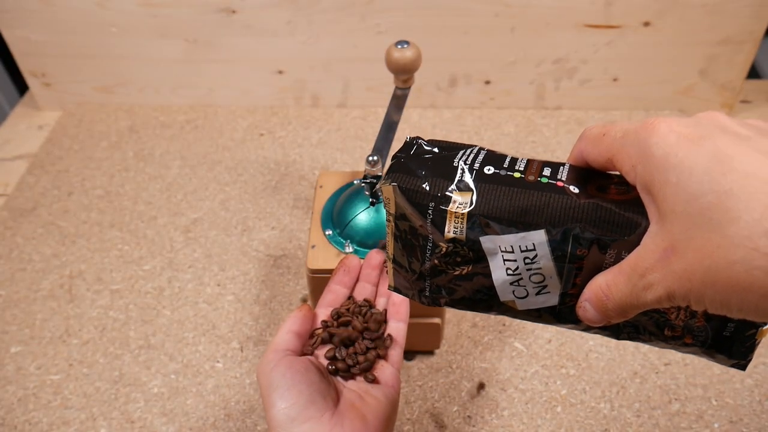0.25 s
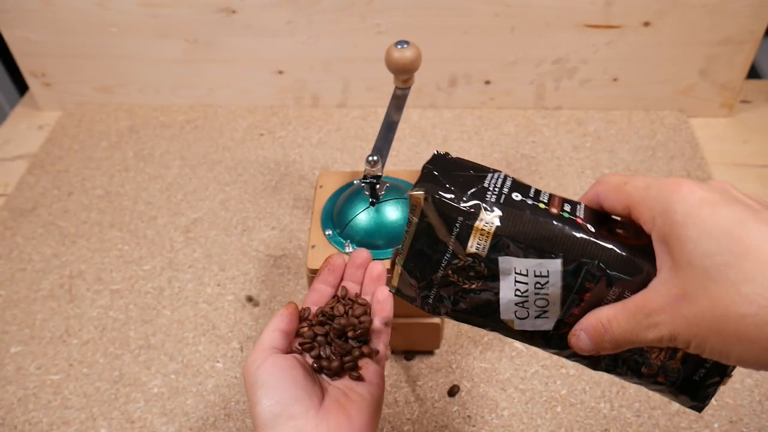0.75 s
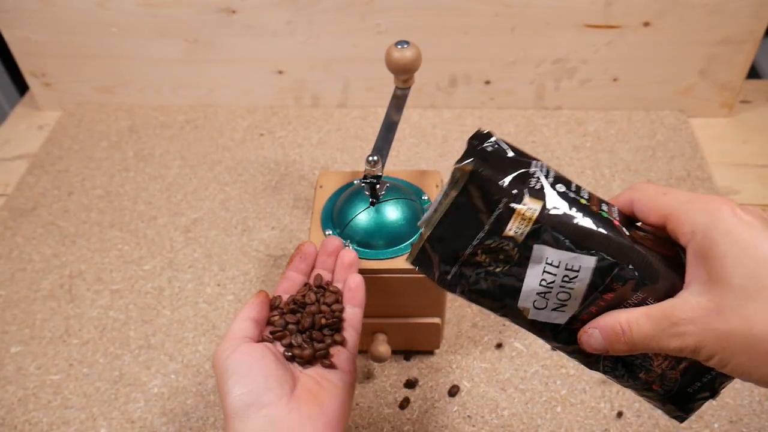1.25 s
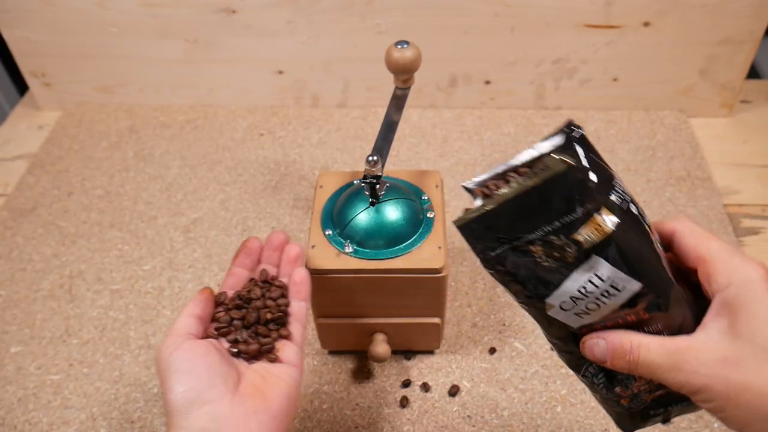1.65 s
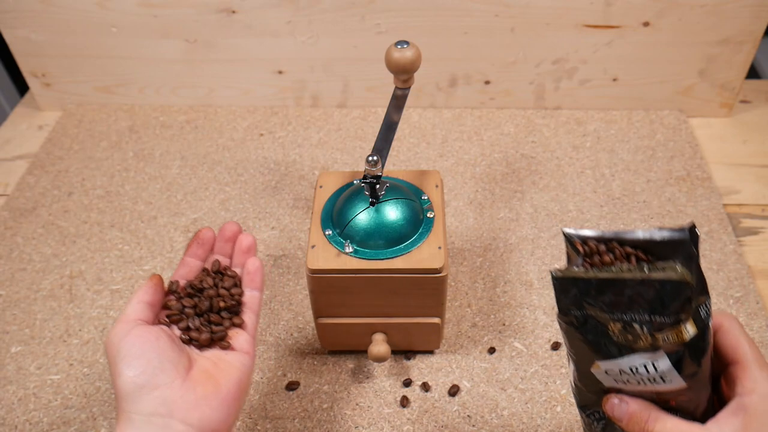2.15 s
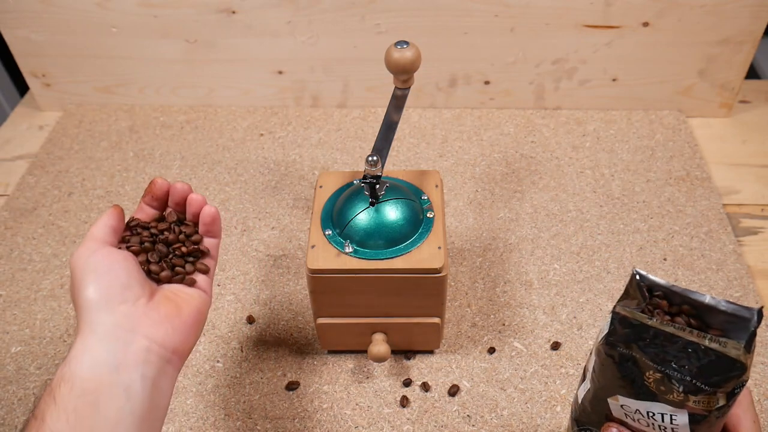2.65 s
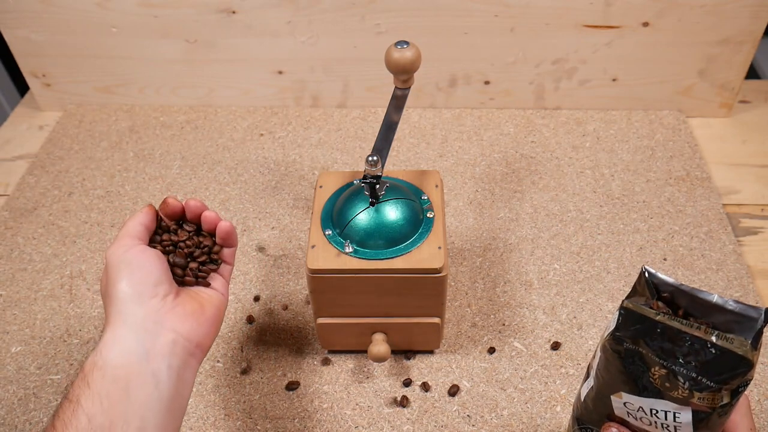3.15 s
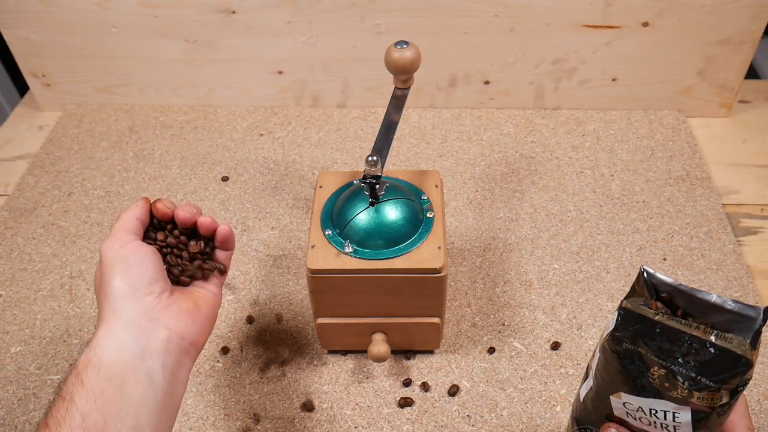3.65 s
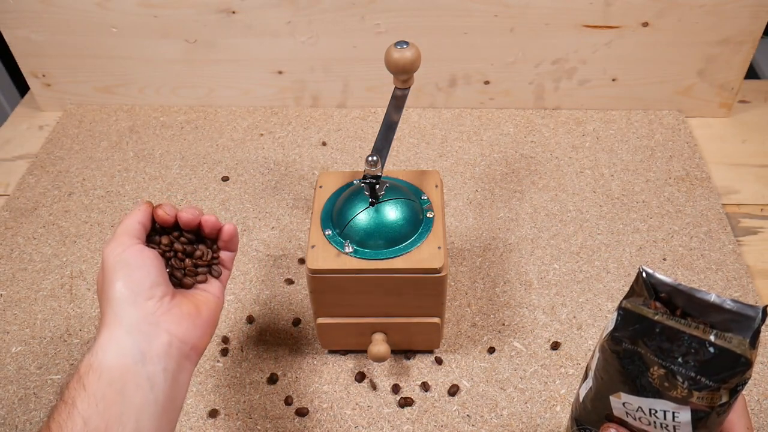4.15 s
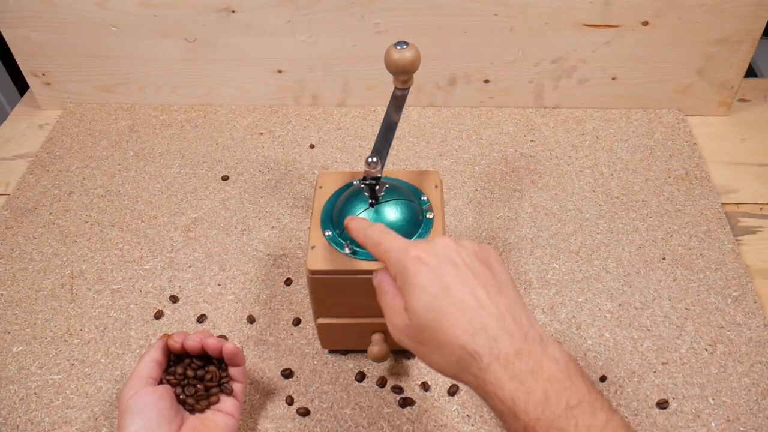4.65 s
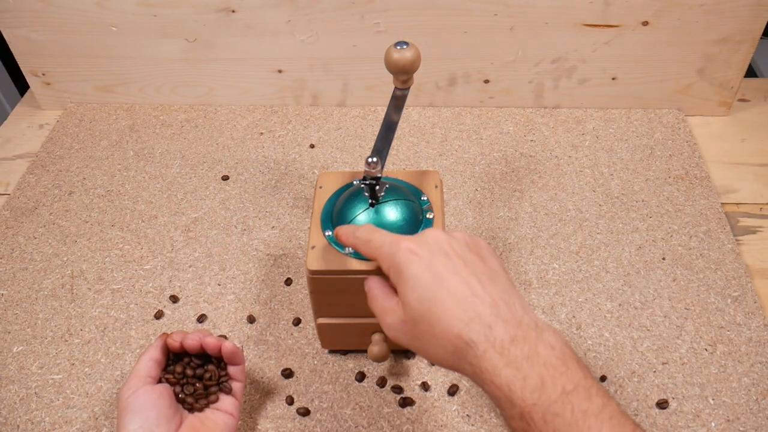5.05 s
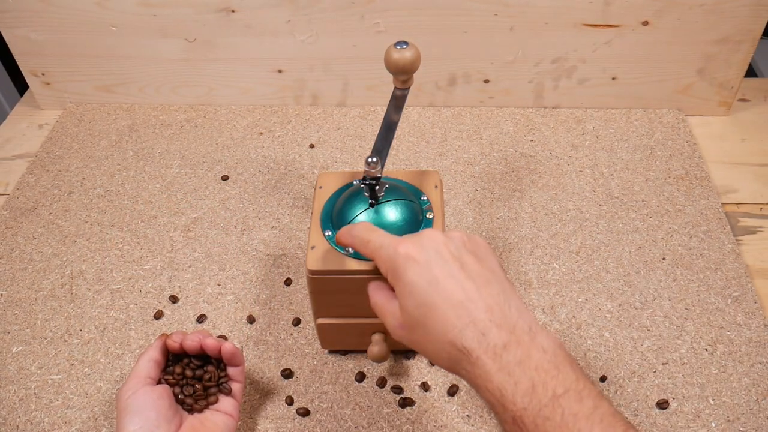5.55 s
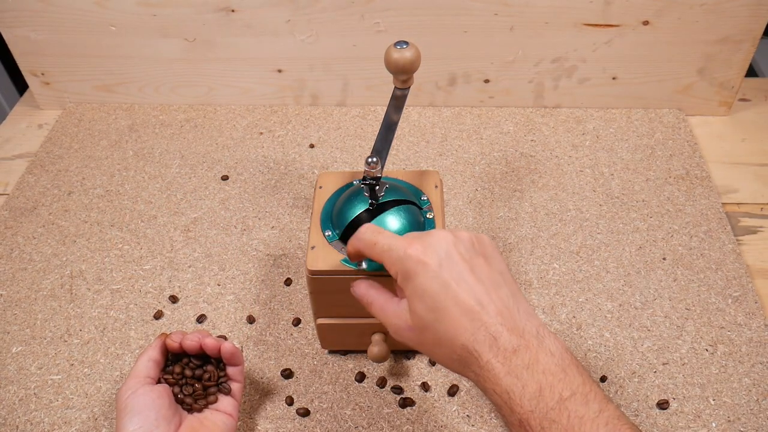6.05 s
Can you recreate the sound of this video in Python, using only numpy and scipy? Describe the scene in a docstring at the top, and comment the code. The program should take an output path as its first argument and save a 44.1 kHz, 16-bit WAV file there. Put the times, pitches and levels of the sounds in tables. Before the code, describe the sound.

Close up in a small bare wooden booth, coffee beans slide and rattle from a snapping foil bag into a hand, single ones ticking on a chipboard table. The pour thins out, the bag rustles and is set down with soft dull knocks. A second spill of beans clatters, drier and lower, then stops. A finger taps a tin lid lightly and rubs it twice. Low mains hum and faint rumble stay underneath.

```python
"""Coffee beans pour from a foil bag into a hand and spill on a chipboard table in a small booth of bare wood:
filtered clicks for single beans and foil snaps, clouds of tiny clicks for the sliding mass. The bag is set down in
strokes of friction noise, crackles and soft knocks; more beans drop. Then a finger taps and slides the tin lid of a
hand mill, heard as decaying sines and more friction. A low hum, rumble, drones and room noise lie below throughout."""
import sys
import numpy as np
from scipy import signal
from scipy.fft import rfft, irfft
from scipy.io import wavfile
from scipy.ndimage import uniform_filter1d

SR = 44100
rng = np.random.default_rng(int(sys.argv[2]) if len(sys.argv) > 2 else 0)


def generate_wav(signal):
    """Clip the signal to [-1, 1] and save it as 16-bit WAV at the path in sys.argv[1]."""
    frames = np.transpose(np.atleast_2d(signal))
    scaled = np.clip(frames, -1, 1) * 32767
    pcm = np.round(scaled).astype(np.int16)
    wavfile.write(sys.argv[1], SR, pcm)


N = 277830

SHELL_HZ = 4460  # centre of the shell sound; knocks above it have no note


def clicks(count=16):
    """Impacts: each click sounds shell, tick and board; its short note and near echoes stay out of the booth."""
    # Single clicks, loud and faint: beans striking table or each other, and bright snaps of the foil;
    # levels relative: (time [s], shell level [dB], bright tick level [dB], tick centre [Hz])
    strikes = [(0.0029, -14, -5, 9200), (0.014, -21, -17.5, 9600), (0.0193, -38, -5, 11600),
               (0.024, -15.5, -18, 12700), (0.053, -19, -10.5, 10700), (0.0594, -40, -10, 12500),
               (0.0977, -15, -8, 12100), (0.1293, -23.5, -12, 14100), (0.149, -24, -3.5, 15000),
               (0.154, -16.5, -21, 13800), (0.1778, -20, -3.5, 9300), (0.1841, -28.5, -4, 10000),
               (0.1858, -18.5, -1, 13000), (0.203, -8, -28, 11000), (0.2137, -19.5, -16, 11100),
               (0.2348, -20, -15, 11700), (0.275, -29.5, -17, 13800), (0.2979, -16, 4.5, 12750),
               (0.3117, -17, -15, 13800), (0.315, -29.5, -12.5, 9000), (0.3383, -11, -17, 8900),
               (0.363, -25, -11.5, 12800), (0.3695, -37, -15, 14000), (0.377, -2.5, -13, 9900),
               (0.406, -6, -9, 8900), (0.4194, -28, -7, 11000), (0.426, -16, -11, 13500),
               (0.4515, -30, -14, 10500), (0.4691, -19, -8.5, 12300), (0.4944, -13, -5.5, 10400),
               (0.5247, -7.5, -14, 7600), (0.579, -18, -25, 9000), (0.604, -21, -16, 11300),
               (0.618, -14, -20, 10100), (0.6369, -9.5, -9, 9500), (0.6404, -16, -11, 9750),
               (0.665, -16.5, -4, 12200), (0.772, -19, -16, 11800), (0.778, -38.5, -4, 12500),
               (0.791, -39.5, -1.5, 12900), (0.799, -25, -13, 13000), (0.806, -13.5, -35, 10600),
               (0.832, -18, -11, 12200), (0.8755, -4, -10, 10100), (0.8933, -6.5, -13, 9900),
               (0.9287, -27, -13, 12500), (0.9464, -10, -18, 9900), (0.9524, -10, -7, 10900),
               (0.9627, -5, -7, 8800), (0.985, -10, -11, 9600), (1.004, -7, -4, 10730),
               (1.024, -10, -13, 9900), (1.039, -26, -11, 14000), (1.063, -14, -30, 9000),
               (1.073, -16, -14.5, 9900), (1.084, -15, -27, 9200), (1.109, -9.5, -13, 10000),
               (1.1438, -12, -7.5, 11100), (1.149, -5.5, -14, 9500), (1.154, -6.5, -16, 10000),
               (1.252, -15, -20, 9650), (1.2631, -13.5, -21, 8500), (1.289, -15, -19, 8600),
               (1.316, -15, -17, 9100), (1.3355, -15, -22, 9500), (1.354, -15, -22.5, 10100),
               (1.412, -21, -30, 10500), (1.4264, -15, -19, 11000), (1.444, -29, -23, 9000),
               (1.498, -18, -27.5, 8900), (1.525, -19.5, -30, 9250), (1.570, -23, -35, 9000),
               (1.588, -20.5, -31, 7900), (1.599, -26, -35, 8500), (1.646, -17.5, -27, 8100),
               (1.666, -25, -33, 8240), (2.5111, -24.5, -62, 8460), (2.6562, -20.5, -30, 7300),
               (2.771, -21, -35, 8100), (2.929, -6.5, -5.5, 11400), (2.94, -8.5, -16, 10100),
               (2.9704, -9, -9.5, 9900), (2.9808, -8, -14, 8400), (3.0195, -8.5, -11, 11500),
               (3.035, -10.5, -8, 9400), (3.081, -16.5, -15, 12000), (3.088, -8, -13, 11100),
               (3.0961, -6, -5.5, 10500), (3.131, -16, -16, 10800), (3.1563, -5.5, -7, 8900),
               (3.236, -16.5, -16, 10500), (3.2593, -8.5, -11, 9600), (3.32, -15, -37, 8600),
               (3.3345, -11.5, -18.5, 9900), (3.3628, -14, -24, 8640), (3.419, -23, -26, 9000),
               (3.4667, -19, -23, 8800), (3.5468, -19.5, -25, 11100), (3.556, -5, -10, 9700),
               (3.5902, -7.5, -12.5, 9000), (3.662, -11.5, -17, 9700), (3.678, -9.5, -5.5, 10300),
               (3.695, -9, -22, 11000), (3.7102, -7.5, -14, 9650), (3.7185, -12, -9, 12400),
               (3.723, -10.5, -12, 10000), (3.7365, -21, -16, 10500), (3.741, -7, -10, 9150),
               (3.7578, -10.5, -9, 13100), (3.775, -17.5, -15, 9700), (3.7844, -6.5, -9, 9700),
               (3.813, -19, -14, 11600), (3.8469, -8.5, -13, 10500), (3.8789, -8, -17, 10000),
               (3.9103, -6.5, -10, 9900), (3.9148, -12.5, -5.5, 12500), (3.9552, -11, -20, 8800),
               (3.968, -7.5, -6, 10500), (3.986, -9.5, -16, 8600), (4.0065, -11, -17, 10400),
               (4.035, -16.5, -17, 10700), (4.0456, -14, -20, 10300), (4.2612, -6.5, -3, 13400),
               (4.412, -14.5, -19, 10800), (4.465, -15, -16, 12100), (4.5509, -17.5, -23, 10200)]
    shell_octaves, tick_octaves = 1.246, 0.7
    board_hz, board_octaves = 1457, 2.016
    note_hz, note_octaves, note_db = 5265, 0.24, -15  # level against the shell
    # Echoes off table, mill and hands crowd the first moments; each may be up to 24 dB weaker than this slope.
    first_db, last_db, echo_span_s = -5.5, -10, 0.0038
    direct, close = np.zeros(N), np.zeros(N)
    draws = rng.random((len(strikes), 3, count))
    for (s, shell_db, tick_db, tick_hz), (place, sign, size) in zip(strikes, draws):
        shell_centre = SHELL_HZ * 2 ** (0.6 * (size[0] - 0.5))
        shell = gain_of(shell_db) * ring(shell_centre, shell_octaves)
        note_centre = note_hz * (1 + 0.15 * (size[2] - 0.5))
        note = gain_of(shell_db + note_db) * ring(note_centre, note_octaves)
        tick = gain_of(tick_db) * (ring(tick_hz, tick_octaves) + 0.22 * ring(tick_hz, 1))
        # The brighter the tick against the shell, the less the board sounds.
        board_db = shell_db - 6.0 - 9.4 * size[1] - 0.44 * max(tick_db - shell_db, 0)
        body = shell + gain_of(board_db) * ring(board_hz, board_octaves)
        add(direct, s, body + tick)
        add(close, s, note)

        late = (np.arange(count) + 0.5 + place) / count
        echo_db = first_db + (last_db - first_db) * late - 24.0 * size
        echo_gains = np.sign(sign - 0.5) * gain_of(echo_db)
        for delay, gain in zip(late * echo_span_s, echo_gains):
            bright = 1.7 * (1 - delay / echo_span_s) * tick  # later echoes are duller
            add(close, s + delay, gain * (body + note + bright))
    return direct, close


def sliding():
    """Dense small collisions of uneven size over a low heap body; all follow the strength of the slide."""
    # Mass of beans sliding in bag and hand, one curve per pour: (time [s], rattle level [dB])
    slides = [
        [(0.0, -40), (0.09, -50.5), (0.46, -38), (0.676, -43), (0.892, -43), (1.032, -30), (1.248, -37.5),
         (1.724, -62.5)],
        [(2.85, -86), (2.982, -38.5), (3.102, -37.5), (3.544, -48), (3.802, -37), (3.896, -38), (4.08, -39),
         (4.394, -61), (4.7, -64.5)],
    ]
    # What each layer rings with:
    # (centre [Hz], width [octaves], scatter either way [octaves], density [grains/s], unevenness [dB])
    grains = [(3150, 2, 0.43, 1000, 7.5), (10500, 1.2, 0.6, 600, 1.5)]
    heap_hz, heap_octaves = 388.5, 4
    heap_share = 0.5  # part of the rattle's swing in dB that the heap follows
    rattle_db = curve(slides, 1)
    out = np.zeros(N)
    for k_layer, (hz, octaves, scatter, per_s, uneven_db) in enumerate(grains):
        heights = gain_of(uneven_db * np.minimum(rng.exponential(1, N), 3))
        hits = heights * (rng.random(N) < per_s / SR) * rng.choice([-1, 1], N)
        kind = rng.integers(0, 9, N)
        kinds_hz = hz * 2 ** (scatter * np.linspace(-1, 1, 9))
        # Nearby surfaces smear each kind of grain differently.
        smear = rng.standard_normal((9, 150)) * gain_of(-np.arange(150) / 10)
        layer = np.zeros(N)
        for k, grain_hz in enumerate(kinds_hz):
            grain = np.convolve(ring(grain_hz, octaves), smear[k])
            layer += signal.oaconvolve(hits * (kind == k), grain)[:N]
        out += gain_of(rattle_db - 13.3 * k_layer) * evened(layer)  # the brighter layer is much fainter
    heap = evened(signal.sosfilt(band(heap_hz, heap_octaves), rng.standard_normal(N)))
    out += gain_of(-47.5 + heap_share * (rattle_db + 35)) * heap
    return out * during(slides)


def rubbing():
    """Foil and skin friction: noise with a grainy grip and sudden slips, shared by three bands."""
    # Strokes, levels relative: (start [s], rise [s], hold [s], fade [s],
    # low rustle level [dB], middle level [dB], hiss level [dB])
    strokes = [(1.924, 0.027, 0.052, 0.031, -36, -38, -49), (2.189, 0.044, .01, 0.15, -68, -52.5, -42),
               (2.238, 0.037, 0.13, 0.51, -36.5, -41, -50), (2.552, 0.068, 0.15, 0.37, -41, -38, -45.5),
               (4.796, 0.051, .02, 0.4, -39, -42.5, -63), (5.339, 0.083, 0.016, 0.28, -35.5, -38, -49.5),
               (5.425, 0.068, 0.019, 0.3, -40, -37.5, -44.5)]
    # Low rustle, middle and hiss: (centre [Hz], width [octaves])
    rub_bands = [(800, 2), (2600, 1.44), (8000, 1.1)]
    grip_db = 3  # rms unevenness of the grip
    edge_db = 33.5  # how far below its top a stroke starts and ends
    slip_blows = rng.exponential(0.4, N) * (rng.random(N) < 260 / SR)
    slips = signal.lfilter([1], [1, -np.exp(-1 / (0.002 * SR))], slip_blows)  # 2 ms time constant
    grip = gain_of(grip_db * evened(uniform_filter1d(rng.standard_normal(N), 300)))
    noise = rng.standard_normal(N) * (1 + slips) * grip
    t, power = np.arange(N) / SR, np.zeros((3, N))
    for s, rise, hold, fade, *dbs in strokes:
        rising = (t - s) / rise
        fading = 1 - (t - s - rise - hold) / fade
        shape = np.minimum(rising, fading).clip(-2, 1) - 1  # 0 at the top, straight slopes in dB
        power += gain_of(np.array(dbs)[:, None] - 8.5 + edge_db * shape) ** 2
    out = np.zeros(N)
    for band_power, (hz, octaves) in zip(power, rub_bands):
        out += np.sqrt(band_power) * evened(signal.sosfilt(band(hz, octaves), noise))
    return out


def crackles():
    """Small dry snaps: each is a click smeared by decaying noise over a few milliseconds."""
    # Crackles of the foil, and of the finger slipping on mill and lid: (time [s], peak level [dB], centre [Hz])
    snaps = [(0.123, -28, 1100), (1.942, -34, 3000), (2.002, -39, 5470), (2.218, -36, 12000),
             (2.328, -20, 2500), (2.618, -29.5, 3200), (2.643, -30, 4500), (2.716, -30, 3170),
             (2.7446, -38, 5000), (4.8233, -42, 3100), (5.4318, -28.5, 2980), (5.4955, -35, 4000),
             (5.512, -31, 5000)]
    out = np.zeros(N)
    for (s, db, hz), smear in zip(snaps, rng.standard_normal((len(snaps), 200))):
        sound = np.convolve(ring(hz, 0.8), smear * gain_of(-0.15 * np.arange(200)))
        add(out, s, gain_of(db) * sound / abs(sound).max())
    return out


def knocks():
    """Soft blows: a puff of noise, with one woody note inside unless it is very bright."""
    # Dull knocks of bag and finger, then one faint bright puff:
    # (time [s], puff level [dB], centre [Hz], puff t60 [s])
    blows = [(1.941, -37, 800, 0.028), (1.993, -37, 1670, 0.058), (2.281, -38, 610, 0.042),
             (2.319, -35, 400, 0.16), (2.331, -33, 1400, 0.26), (2.618, -35.5, 1200, 0.025),
             (2.654, -32, 870, 0.077), (2.719, -36.5, 1110, 0.038), (2.77, -31.5, 990, 0.037),
             (2.981, -16.5, 2170, 0.038), (3.842, -21.5, 2350, 0.021), (4.21, -33, 1510, 0.044),
             (4.824, -32, 436, 0.054), (4.877, -34.5, 1960, 0.022), (5.432, -36, 895, 0.069),
             (5.51, -38, 730, 0.046), (6.014, -59.5, 6800, 0.28)]
    out, t = np.zeros(N), np.arange(9000) / SR
    for s, db, hz, t60 in blows:
        puff_colour = [(hz / 4, -30), (hz / 1.3, 0), (hz * 1.3, 0), (hz * 4, -24), (hz * 40, -80)]
        body = coloured(puff_colour, size=len(t))
        if hz < SHELL_HZ:
            # The note's own decay adds to the puff's, so it dies twice as fast.
            body = body + 1.2 * np.sin(2 * np.pi * hz * t) * gain_of(-60 * t / t60)
        onset = 1 - np.exp(-t / 0.00014)
        add(out, s, gain_of(db - 60 * t / t60) * body * onset)
    return out


def lid_taps():
    """The tin lid's thin ring: each tap starts a set of decaying sine modes."""
    # Finger taps: (time [s], level [dB])
    taps = [(4.878, -39), (4.885, -34)]
    # Modes of the lid: (frequency [Hz], level against the tap [dB], t60 [s])
    modes = [(3445, -1, .115), (3550, -9, .06), (2450, -6, .045), (2202, -4, .07), (2030, -5, .08),
             (3950, -11, .04)]
    out, t = np.zeros(N), np.arange(9000) / SR
    for s, tap_db in taps:
        lid_ring = np.zeros(len(t))
        for hz, mode_db, t60 in modes:
            lid_ring += gain_of(tap_db + mode_db - 60 * t / t60) * np.sin(2 * np.pi * hz * t)
        add(out, s, lid_ring * np.minimum(t / 0.001, 1))
    return out


def tail():
    """One booth tail: sparse taps of random sign, each band dying at its own speed; energy 1."""
    # Decay of the booth: (frequency [Hz], t60 [s])
    decay = [(500, 0.32), (1500, 0.44), (4000, 0.6), (8000, 0.21), (14000, 0.22)]
    # Colour at the start of the tail, weaker in the treble: (frequency [Hz], level [dB])
    colour = [(500, 3), (4000, -1), (8000, -0.5), (14000, -5)]
    taps = np.zeros(SR // 2)
    slots = np.arange(170, SR // 2 - 10, 10)
    taps[slots + rng.integers(0, 10, len(slots))] = rng.choice([-1., 1.], len(slots))
    hz, t, z = signal.stft(taps, SR, nperseg=256)
    level_db = read(colour, hz)[:, None] - 60 * t / read(decay, hz)[:, None]
    sound = signal.istft(z * gain_of(level_db), SR, nperseg=256)[1]
    return sound / np.linalg.norm(sound)


def booth(x, count=8):
    """Several tails take turns, which keeps the reverberation smooth; the two sides differ only a little."""
    turn = 2 * np.pi * 9 * np.arange(N) / SR  # nine rounds a second
    mid = np.zeros(N)
    for k in range(count):
        share = (1 + np.cos(turn + 2 * np.pi * k / count)) / count  # power shares add up to 1
        mid += signal.fftconvolve(x * np.sqrt(share), tail())[:N]
    side = 0.097 * signal.fftconvolve(x, tail())[:N]
    return np.array([mid + side, mid - side])


def hum():
    """Low hum: one sine near 51 Hz whose level wavers."""
    # Wavering of the hum: (time [s], rms level [dB])
    waver = [(0.07, -42.5), (0.74, -39), (1.1, -45), (1.7, -36.5), (1.96, -46.5), (2.25, -36),
             (2.54, -40.5), (6.3, -39.5)]
    hum_hz = 50.8
    t = np.arange(N) / SR
    return np.sqrt(2) * gain_of(curve(waver, 1)) * np.sin(2 * np.pi * hum_hz * t)


def table_rumble():
    """Steady low noise, plus deep noise thumps through the table as hands and bag move."""
    # Thumps, before their rise and decay: (time [s], level [dB])
    thumps = [(2.581, -33), (3.3, -36)]
    rise_s, t60_s, rumble_db = 0.014, 0.99, -47.5
    t, shake = np.arange(N) / SR, np.zeros(N)
    for s, db in thumps:
        add(shake, s, gain_of(db - 60 * t / t60_s) * np.minimum(t / rise_s, 1))
    rumble = gain_of(rumble_db) * coloured([(14, -44.0), (28, -8), (40, 6.5), (60, -15.5), (110, -63.5)])
    return rumble + shake * coloured([(14, -18), (28, -1), (40, -5), (50, -13.5), (90, -73.0)])


def drones():
    """Faint fuzzy drones: noise narrowed to bell-shaped bands."""
    # Drones: (centre [Hz], half width of the bell [Hz], rms level [dB])
    drone_bands = [(139.9, 18, -61), (184.5, 1.84, -62), (204.2, 1.4, -62.5)]
    hz, out = np.fft.rfftfreq(N, 1 / SR), np.zeros(N)
    for centre, width, db in drone_bands:
        bell = np.exp(-((hz - centre) / width) ** 2)
        out += gain_of(db) * evened(irfft(rfft(rng.standard_normal(N)) * bell, N))
    return out


def room_noise():
    """Shaped noise for the middle, and a separate weaker noise of opposite sign left and right."""
    # Colour of the room noise: (frequency [Hz], relative density [dB per Hz])
    colour = [(38, -35), (65, -11), (103, -18), (192, -15), (411, -22), (963, -23.5), (3580, -28),
              (8000, -45.5), (16000, -59.5)]
    level = gain_of(-49.5)
    middle, other = level * coloured(colour), level * coloured(colour)
    return middle, 0.11 * signal.sosfilt(band(1900, 6.8), other)


def ring(hz, octaves):
    """A dry click: one blow through a broad band; peak 1."""
    sound = signal.sosfilt(band(hz, octaves), signal.unit_impulse(400))
    return sound / abs(sound).max()


def band(hz, octaves):
    """A band-pass round hz, with its edges held below the top of the spectrum."""
    edges = hz * 2 ** (np.array([-0.5, 0.5]) * octaves)
    edges = np.minimum(edges, [0.38 * SR, 0.45 * SR])
    return signal.butter(3, edges, "band", fs=SR, output="sos")


def coloured(points, size=N):
    """Noise of rms 1 with a spectrum in dB."""
    hz = np.fft.rfftfreq(size, 1 / SR)
    spectrum = rfft(rng.standard_normal(size)) * gain_of(read(points, hz))
    return evened(irfft(spectrum, size))


def gain_of(db):
    """Decibels to gain."""
    return 10 ** (np.asarray(db) / 20)


def evened(x):
    """Scales to rms 1."""
    return x / np.sqrt(np.mean(x ** 2) + 1e-20)


def read(points, hz):
    """Reads a table along log frequency."""
    f, value = np.transpose(points)
    return np.interp(np.log(hz + 1), np.log(f + 1), value)


def curve(rows, column):
    """One column of a curve table, or of several in a row, at every sample."""
    rows = np.vstack(rows)
    return np.interp(np.arange(N) / SR, rows[:, 0], rows[:, column])


def during(spans):
    """1 inside the spans of a list of curve tables, with soft edges."""
    t = np.arange(N) / SR
    inside = sum(1. * (t >= rows[0][0]) * (t <= rows[-1][0]) for rows in spans)
    return uniform_filter1d(inside, 600)


def add(mix, s, sound):
    """Mixes a sound in at time s."""
    part = mix[max(round(s * SR), 0):][:len(sound)]
    part += sound[:len(part)]


def scene():
    """Everything close and nearly mono, with the booth behind."""
    direct, close = clicks()
    soft = sliding() + rubbing()
    blows = crackles() + knocks() + lid_taps()
    near = gain_of(-2.16) * direct + close + blows + soft
    # Single clicks fill the booth most; hands shade the knocks, crackles and lid from the walls.
    thrown = gain_of(1) * direct + gain_of(-8) * blows + soft
    reverb = gain_of(-7.5) * booth(thrown)
    air, air_side = room_noise()
    lag = np.roll(near, -3) - np.roll(near, 3)  # a small widening of the near sounds
    side = 0.043 * lag + air_side
    middle = near + hum() + table_rumble() + drones() + air
    return middle + np.array([side, -side]) + reverb


def record(dry):
    """The input stage rounds the tallest clicks; then the band limit."""
    edge_hz = 16100
    rounded = np.tanh(dry / 1.1) * 1.1
    low_pass = signal.firwin(255, edge_hz, window=("kaiser", 9), fs=SR)
    return signal.oaconvolve(rounded, low_pass[None], "same")


dry = scene()
out = record(dry)
generate_wav(out)
```